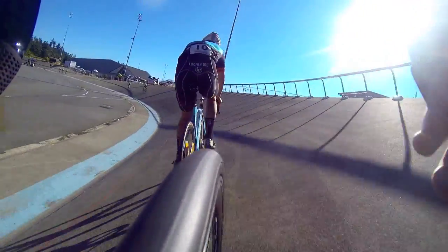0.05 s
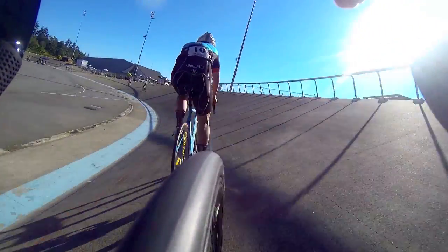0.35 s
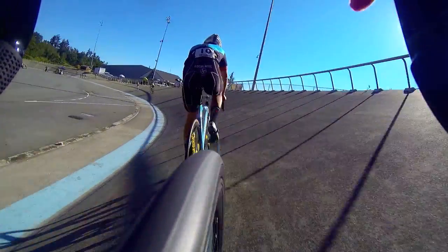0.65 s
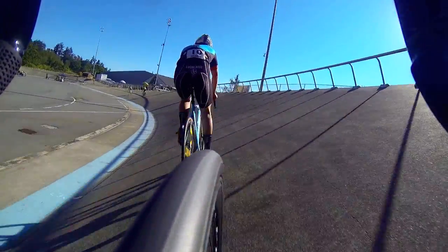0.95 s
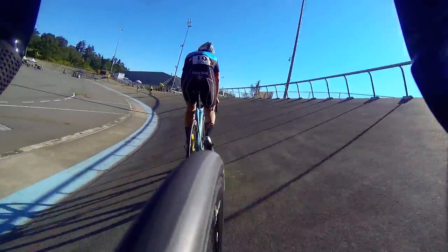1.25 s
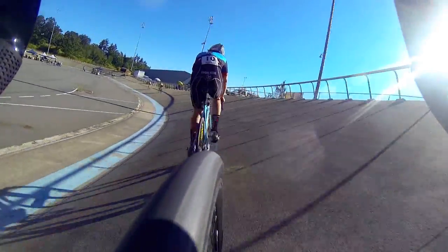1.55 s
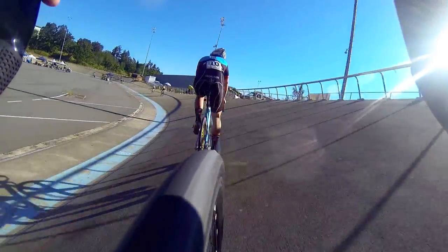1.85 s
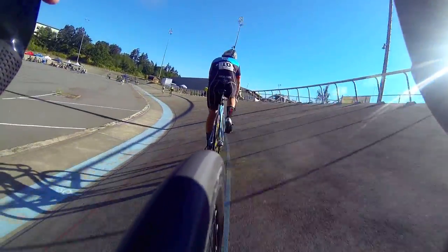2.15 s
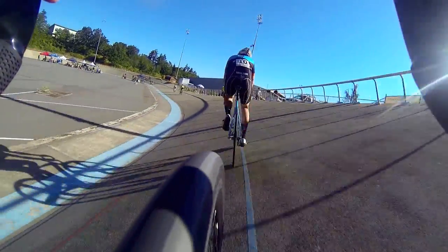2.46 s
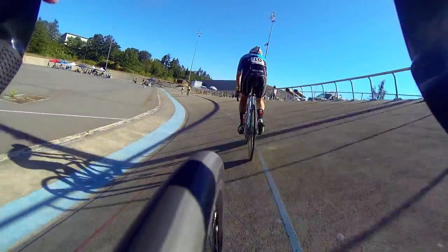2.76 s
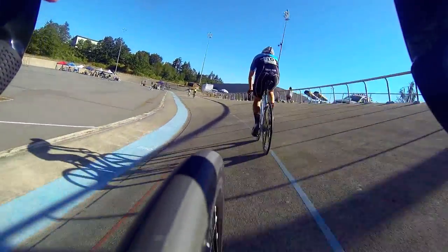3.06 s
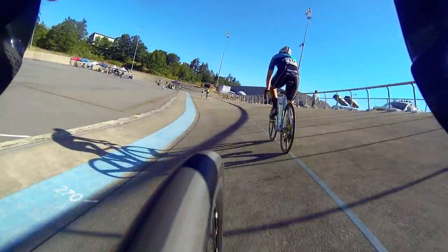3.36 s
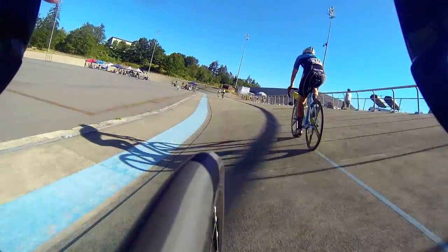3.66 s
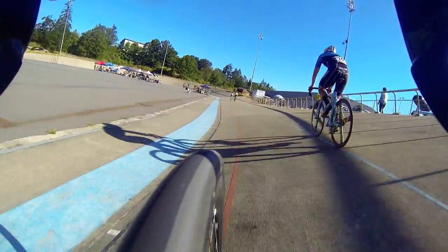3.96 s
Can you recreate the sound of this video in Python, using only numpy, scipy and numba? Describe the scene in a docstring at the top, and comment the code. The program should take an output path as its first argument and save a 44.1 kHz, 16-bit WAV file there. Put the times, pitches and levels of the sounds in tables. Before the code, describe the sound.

A bicycle rides on a concrete track for four seconds, heard through a microphone mounted on it. Deep, wobbling wind rumble and tyre hum run throughout, with a thin ringing rasp, faint chain buzz and tiny grit ticks. Soft bumps swell at about 0.2, 0.9 and 2.4 seconds. A loud, sharp knock at 3.6 seconds briefly dips the other sound, and a softer one follows at 3.9.

```python
"""On a concrete track, a camera bolted to a racing bicycle hears the ride mostly through its own housing.
Wind rumbles, the mount wobbles, grit ticks on the frame and the chain buzzes over the teeth.
The tyres shake the frame and make the housing rasp. Near the end two sharp knocks ring the mount,
and a limiter (an automatic volume control) turns the sound down for a moment."""
import sys
import numpy as np
from scipy import signal
from scipy.fft import rfft, irfft
from scipy.io import wavfile
from scipy.ndimage import map_coordinates
from numba import njit

SR = 44100
rng = np.random.default_rng(int(sys.argv[2]) if len(sys.argv) > 2 else 0)


def pcm_store(signal):
    """Save signal as 16-bit PCM."""
    levels = np.round(np.clip(np.atleast_2d(signal), -1, 1) * 32767)
    wavfile.write(sys.argv[1], SR, levels.astype(np.int16).T)


N = 176400

# notes at which the frame and mount ring: f/Hz, width/Hz, level/dB
FRAME_MODES = [(196.2, 4.8, 4.5), (235, 3.1, -36), (478.4, 15.1, -12), (583, 15, -34)]
# how hard the chain rattles as pedals and track load it: t/s, level/dB
CHAIN_RATTLE = [(0.0, -50.6), (0.07, -53.0), (0.18, -41.1), (0.24, -53.4), (0.38, -52.3), (0.42, -48.7),
                (0.61, -54.4), (0.66, -47.5), (0.78, -53), (0.91, -45.0), (0.96, -57.5), (0.99, -52.2),
                (1.14, -54.3), (1.24, -45.2), (1.28, -49.4), (1.32, -44.4), (1.35, -50.1), (1.38, -45.9),
                (1.47, -56.6), (1.52, -43.5), (1.6, -50), (1.71, -52), (1.97, -45.2), (2.0, -51.1),
                (2.04, -47.0), (2.25, -53.4), (2.4, -45.0), (2.49, -44.5), (2.56, -51), (2.64, -51.1),
                (2.77, -50.1), (2.84, -45.6), (2.87, -52.3), (2.9, -48.0), (3.02, -49.7), (3.09, -44.5),
                (3.13, -50.7), (3.28, -47.5), (3.31, -52.4), (3.44, -50.9), (3.46, -54.6), (3.52, -47.1),
                (3.59, -53.6), (3.94, -53.7), (4.0, -49.2)]


def undb(db):
    """Turn decibels into a number to multiply by."""
    return 10 ** (np.asarray(db) / 20)


def unit(x):
    """Scale to an average power of 1."""
    return x / np.sqrt(np.mean(x ** 2))


def curve(rows):
    """Join (t/s, value) rows by straight lines."""
    return np.interp(np.arange(N) / SR, *np.array(rows).T)


def noise():
    """White noise: an even hiss."""
    return rng.standard_normal(N)


def drift(per_s):
    """Wander smoothly, by about 1 either way, through per_s random values a second."""
    knots = rng.standard_normal(4096)
    return 1.1 * map_coordinates(knots, [np.arange(N) / SR * per_s], order=2, mode="wrap")


def colour(x, points):
    """Make some frequencies stronger and others weaker, along (f/Hz, level/dB) points."""
    hz, db = np.array(points).T
    freqs = np.arange(N + 1) * SR / (2 * N)
    gain = unit(undb(np.interp(np.log(freqs + 1), np.log(hz), db)))
    # fold the filter so that it rings only after a sound, never before
    cepstrum = irfft(np.log(gain))
    cepstrum[1:N] *= 2
    cepstrum[N + 1:] = 0
    return irfft(rfft(x, 2 * N) * np.exp(rfft(cepstrum)))[:N]


def resonate(x, modes):
    """Let x ring at a few notes, given as (f/Hz, width/Hz, level/dB)."""
    s = 1j * np.arange(N + 1) * SR / (2 * N)
    band = lambda hz, width: s * width / (s ** 2 + s * width + hz ** 2)
    response = sum(undb(db) * band(hz, width) * band(hz, hz) for hz, width, db in modes)
    response /= np.sqrt(np.mean(abs(response) ** 2))
    return irfft(rfft(x, 2 * N) * response)[:N]


def burst(start, decay_s):
    """A level that jumps up, then dies away."""
    age = np.arange(N) / SR - start
    return (age >= 0) * np.exp(-np.clip(age / decay_s, 0, 60))


@njit
def follow(x, attack, release):
    """Track a level, rising at the attack rate and falling at the release rate."""
    out, level = np.empty(len(x)), 0.
    for i in range(len(x)):
        level += (x[i] - level) * (attack if x[i] > level else release)
        out[i] = level
    return out


def wind():
    """Buffeting air makes a deep, uneven rumble."""
    # tone of the rumble: f/Hz, level/dB
    tone = [(10, -49), (22, -23.5), (40, 6), (55, 0), (70, -3), (90, -21), (200, -24), (3000, -120)]
    return undb(-25 + 2 * drift(6.9)) * colour(noise(), tone)


def mount_wobble():
    """The camera mount rocks to and fro, making a very low, almost pure tone."""
    # how fast it rocks: t/s, f/Hz
    pitch = [(0.0, 39.0), (0.14, 34.5), (0.7, 28), (0.84, 37), (0.95, 31.0), (1.42, 34.5), (1.97, 29.5),
             (2.28, 34), (2.38, 27), (2.48, 31), (2.92, 36), (3.05, 29.5), (3.19, 29.5), (4.0, 36)]
    # how far it rocks: t/s, level/dB
    swing = [(0.0, -15), (0.1, -21), (0.21, -14), (0.28, -19), (0.37, -14), (0.72, -15), (0.81, -20),
             (0.93, -14.5), (1.3, -18), (1.37, -14), (1.51, -19), (1.57, -13.5), (1.72, -15), (1.77, -24),
             (1.83, -12.5), (1.93, -25), (2.0, -15), (2.28, -17.5), (2.36, -27), (2.52, -15), (2.95, -16),
             (3.0, -21), (3.1, -15.5), (3.61, -15), (3.73, -22), (3.79, -13.5), (4.0, -18)]
    phase = 2 * np.pi * np.cumsum(curve(pitch) * (1 + 0.0451 * drift(4))) / SR
    return np.sqrt(2) * np.sin(phase) * undb(curve(swing) - 1 + 1.6 * drift(12))


def grit():
    """Grit hits the frame: a few clear ticks, and fine ones that grow thicker and louder with the rattle."""
    # the clear ticks: t/s, level/dB
    ticks = [(0.2015, -52), (0.215, -53), (0.3142, -56), (0.3841, -55), (0.464, -57), (0.682, -55),
             (0.9209, -52), (1.0361, -57), (1.0685, -55), (1.2471, -54), (1.322, -54), (1.3998, -55),
             (1.5205, -54), (1.548, -54), (1.563, -54), (1.6901, -57), (1.8243, -54), (1.8405, -52),
             (1.9799, -53), (2.0857, -54), (2.101, -53), (2.2099, -56), (2.5556, -53), (2.6155, -54),
             (2.9138, -52), (3.297, -55), (3.5514, -56), (3.838, -53)]
    # tone of a tick: f/Hz, level/dB
    tone = [(1500, -12), (3000, 0), (4500, 0), (6500, -3), (9000, -7), (12000, -12), (13500, -22),
            (16000, -36)]
    decay_s, fine_per_s = .0016, 150
    clear = sum(undb(db + 1) * burst(start, decay_s) for start, db in ticks)
    shake = curve(CHAIN_RATTLE)
    surge_db = .75 * (shake - shake.mean())
    hits = rng.random(N) < fine_per_s * undb(surge_db) / SR
    grains = hits * undb(-62.5 + surge_db - 16 * rng.random(N))
    fine = signal.lfilter([1], [1, -np.exp(-1 / (decay_s * SR))], grains)  # each grain dies away
    return colour(noise() * (clear + fine), tone)


def chain():
    """Each link lands on a tooth with a short rattle of uneven strength; together they buzz."""
    # tone of the chain through frame and housing: f/Hz, level/dB
    tone = [(1500, -17), (2500, -18), (2830, 4), (3000, 1.5), (3250, -15.5), (3600, -3.5), (3760, -2.5),
            (3900, -15), (4070, 0), (4280, -10.5), (4520, 1.5), (4750, -14), (4980, -5), (5180, -23),
            (5400, -7), (5580, -36), (5870, -17.5), (6150, -23.5), (6330, -22), (6550, -26), (7280, -27.5),
            (8000, -42), (12400, -47.5), (15000, -63.5)]
    links_per_s, scatter_db, decay_links = 70.7, 3.6, .35
    links_passed = np.cumsum(links_per_s * (1 + .018 * drift(4.6))) / SR
    strength = undb(scatter_db * rng.standard_normal(1024))[links_passed.astype(int)]
    rattle = unit(.24 + strength * np.exp(-(links_passed % 1) / decay_links))
    return colour(noise() * rattle * undb(curve(CHAIN_RATTLE) + .5), tone)


def bumps():
    """Dips in the concrete make the frame's lowest note swell and die away."""
    # dips in the track: t/s, level/dB
    dips = [(0.173, -18.5), (0.892, -19.5), (2.396, -19)]
    rise_s, lowest_hz = .02, FRAME_MODES[0][0]
    out = np.zeros(N)
    for start, db in dips:
        age = np.maximum(np.arange(N) / SR - start, 0)
        swell = age / rise_s * np.exp(1 - age / rise_s)
        out += undb(db) * swell * np.sin(2 * np.pi * lowest_hz * age)
    return out


def tyres():
    """Rolling on rough concrete makes the frame hum and the housing rasp; the housing muffles it all."""
    # how hard the track shakes the frame: t/s, level/dB
    roughness = [(0.0, -40), (0.18, -32.5), (0.25, -37.5), (0.36, -36), (0.79, -40), (0.84, -34),
                 (0.91, -30.5), (0.95, -44.5), (1.02, -32.5), (1.1, -39.5), (1.22, -31.5), (1.36, -37),
                 (1.46, -37), (1.54, -32.5), (1.59, -36.5), (1.73, -38.5), (1.8, -29.5), (1.85, -37.5),
                 (1.96, -32), (2.15, -38.5), (2.19, -35.5), (2.35, -37), (2.42, -29), (2.51, -34),
                 (2.77, -38.5), (2.92, -33), (3.09, -31.5), (3.13, -35.5), (3.28, -33.5), (3.48, -38),
                 (3.54, -38.5), (4.0, -42)]
    # tone of the rolling noise: f/Hz, level/dB
    roll_tone = [(60, -14.5), (92, -4), (130, 4), (175, 2), (225, -4.5), (270, -15.5), (320, -30.5),
                 (385, -9.5), (455, -8), (530, -14), (620, -6.5), (700, -18), (870, -30), (1100, -31.5),
                 (2000, -47.5), (4000, -47), (9000, -110)]
    # tone of the rasp: f/Hz, level/dB
    rasp_tone = [(700, -21.5), (900, -19), (1005, -5.5), (1130, -20.5), (1235, -2), (1400, 0), (1540, 4.5),
                 (1650, -2), (1760, 0.5), (1900, -12.5), (1980, -3), (2130, -15.5), (2500, -21),
                 (3500, -78.5), (9000, -83)]
    # notes at which the housing rings: f/Hz, width/Hz, level/dB
    housing_modes = [(1270, 10, -5.5), (1480, 25, -5), (1528, 30.6, 29.5), (1710, 23, -6.5),
                     (2040, 16, -13)]
    muffle_hz = 3800
    road_db, jolts = curve(roughness), drift(70)
    surge_db = road_db - road_db.mean()
    roll = colour(noise() * undb(6.5 + road_db + 2 * jolts), roll_tone)
    frame = resonate(noise() * undb(-28.5 + 1.26 * surge_db), FRAME_MODES)
    shake = undb(.94 * surge_db + 1.5 * jolts)
    rasp = undb(-38.5) * colour(noise() * shake, rasp_tone)
    housing = undb(-42) * resonate(noise() * shake, housing_modes)
    muffle = signal.butter(4, muffle_hz, fs=SR, output="sos")
    return signal.sosfilt(muffle, roll + frame + rasp + housing)


def knocks():
    """The mount strikes its stop, then presses home more slowly: a hard clack over a low ring."""
    # knocks: t/s, level/dB, contact time/s, push delay/s, push boost/dB, push time/s, crack level/dB
    strikes = [(3.6401, 6.8, .000057, .0015, 3.7, .00027, -11),
               (3.8594, -4, .000065, .00127, 5.7, .00017, -26)]
    # notes that a knock rings: f/Hz, level/dB, time to fade by 60 dB/s
    modes = [(197, -12.6, .16), (320, -6, .014), (440, -11.5, .018), (775, -13, .024), (1130, -9.5, .006),
             (1490, -10.5, .011), (2290, -4.5, .007), (3050, -1.7, .006), (3450, -2.5, .006),
             (4200, -7.5, .006), (6350, -11.5, .005), (3040, -44, .09)]
    # tone of the sharp crack: f/Hz, level/dB
    crack_tone = [(300, -3), (1500, -2), (3200, 0.5), (4500, -9), (6500, -14), (9000, -21), (12000, -35),
                  (16000, -46)]
    t, out = np.arange(N // 8) / SR, np.zeros(2 * N)
    ring = sum((-1) ** k * undb(db) * np.sin(2 * np.pi * hz * t) * np.exp(-np.log(1000) * t / fade_s)
               for k, (hz, db, fade_s) in enumerate(modes))
    for start, db, contact_s, push_delay, push_db, push_s, crack_db in strikes:
        for delay, force_s, boost_db in ((0, contact_s, 0), (push_delay, push_s, push_db)):
            force = t * np.exp(-t / force_s)  # a longer contact sounds duller
            clack = signal.fftconvolve(force / force.sum(), ring)[:len(t)]
            at = int((start + delay) * SR)
            out[at:at + len(t)] -= undb(db + boost_db) * clack
        out[:N] += undb(crack_db) * colour(noise() * burst(start, decay_s=.0013), crack_tone)
    return out[:N]


def scene():
    """All the sounds add up at one microphone."""
    return (tyres() + bumps() + chain() + grit() + mount_wobble() + wind() + knocks())[None]


def record(dry):
    """A limiter dips after loud peaks, what slips through is rounded off, and the highest treble is cut."""
    limit_db, attack_s, release_s, top_hz = -5.5, .0016, .1, 15800
    level = follow(abs(dry[0]), 1 / (attack_s * SR), 1 / (release_s * SR))
    held = dry / np.maximum(1, level / undb(limit_db))
    rounded = held / (1 + held ** 6) ** (1 / 6)
    return signal.sosfilt(signal.ellip(8, .2, 70, top_hz, fs=SR, output="sos"), rounded)


dry = scene()
out = record(dry)
pcm_store(out)
```